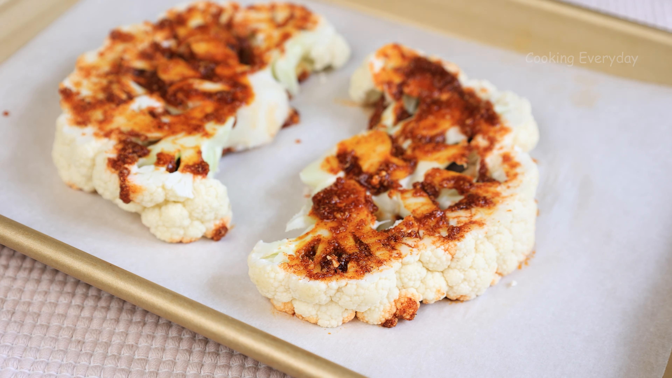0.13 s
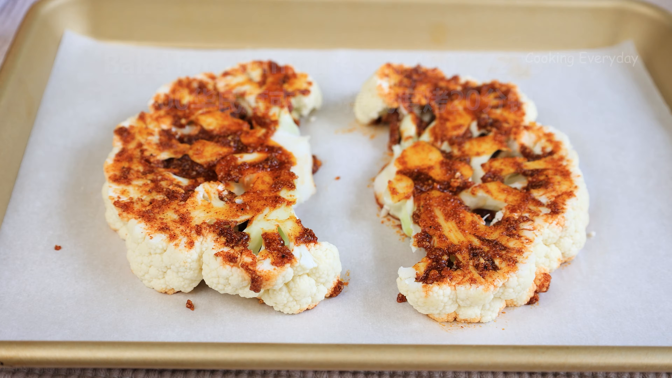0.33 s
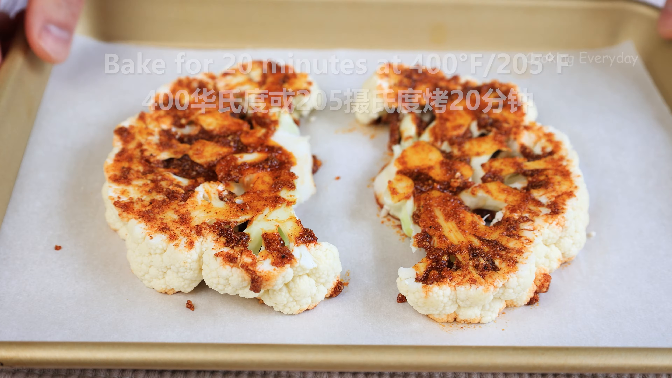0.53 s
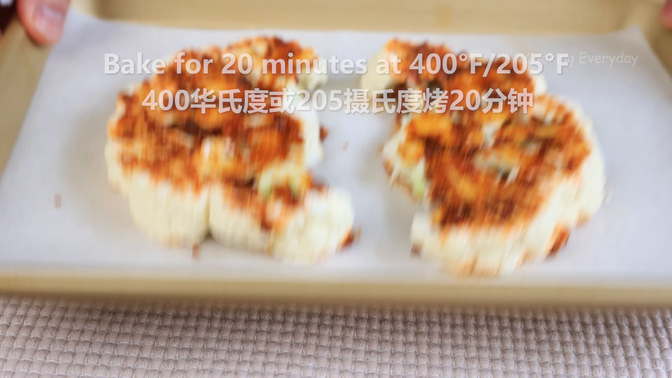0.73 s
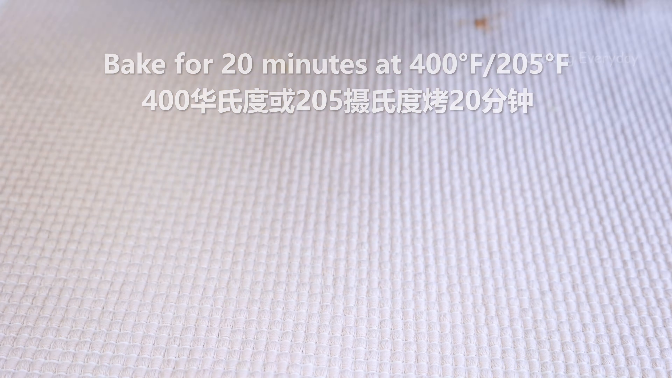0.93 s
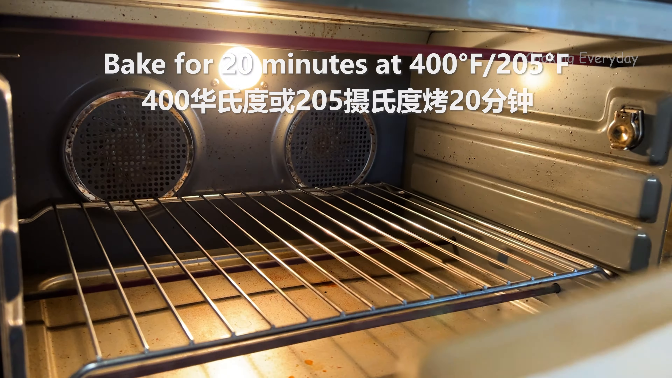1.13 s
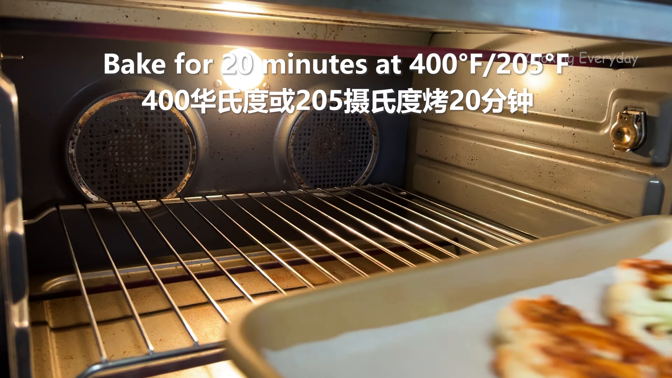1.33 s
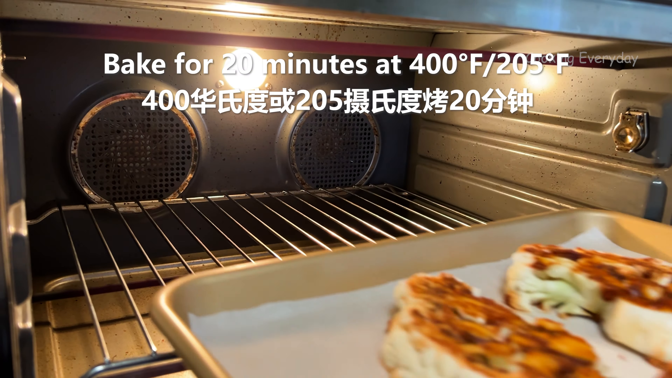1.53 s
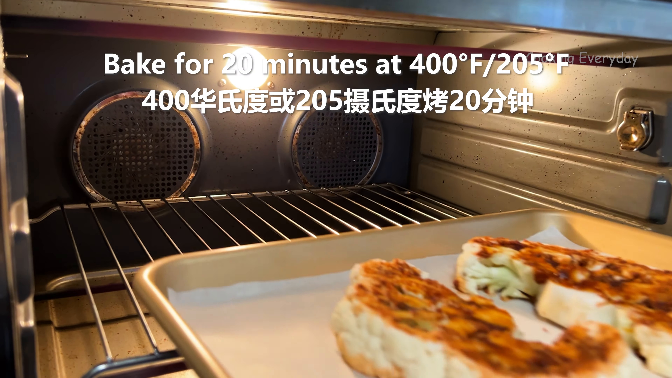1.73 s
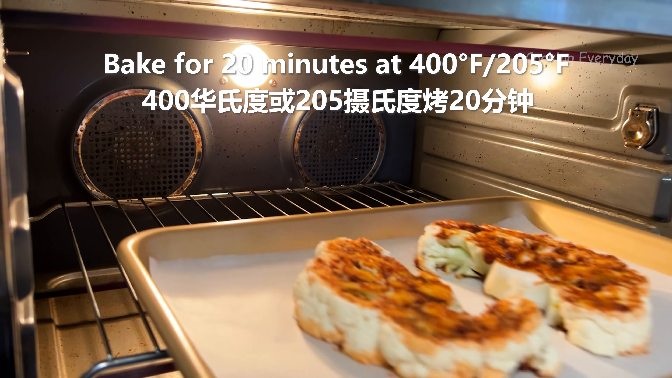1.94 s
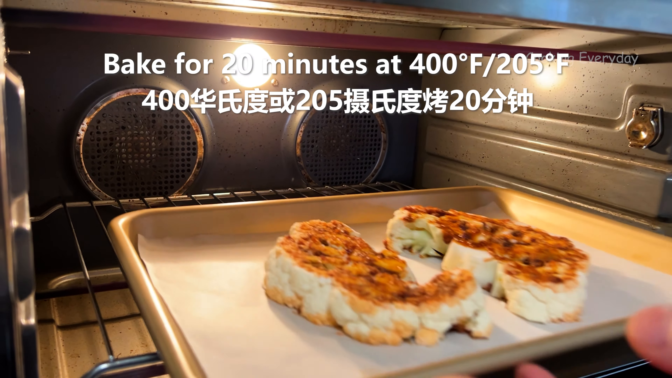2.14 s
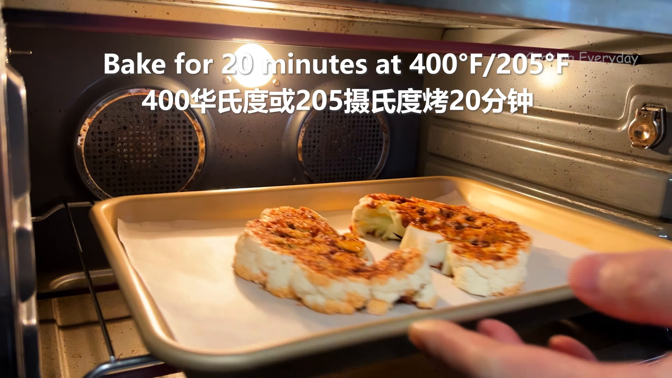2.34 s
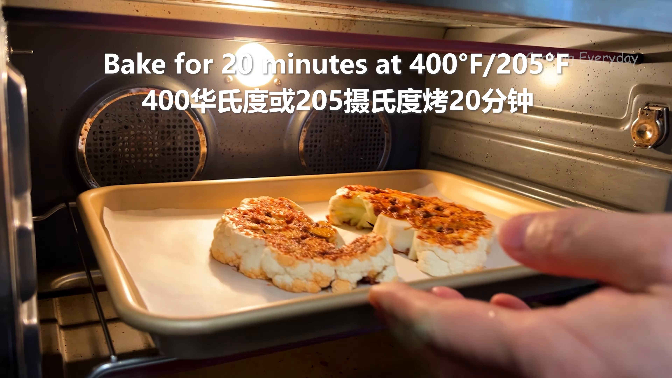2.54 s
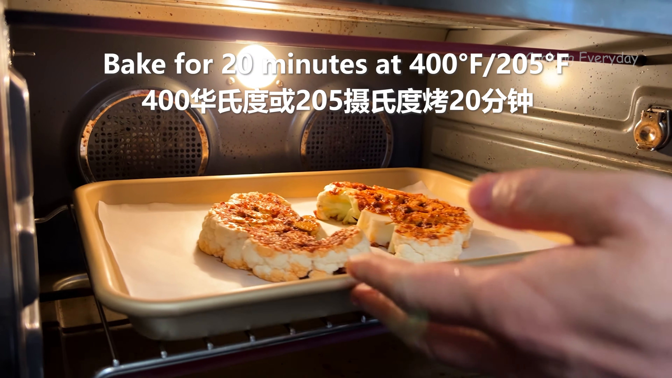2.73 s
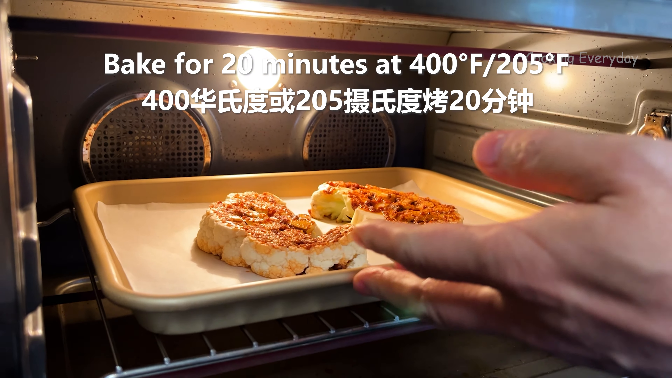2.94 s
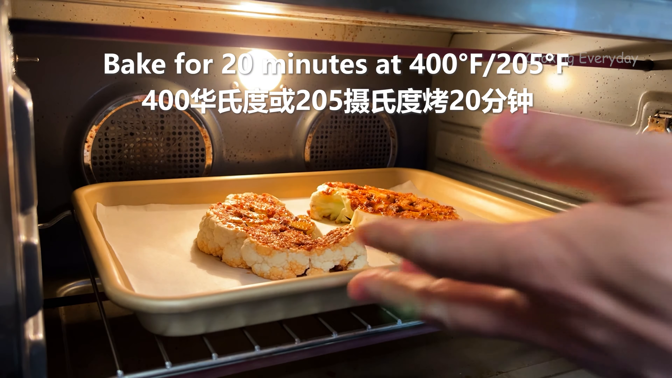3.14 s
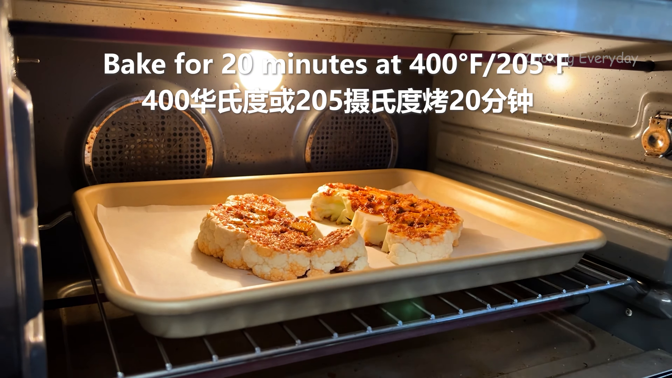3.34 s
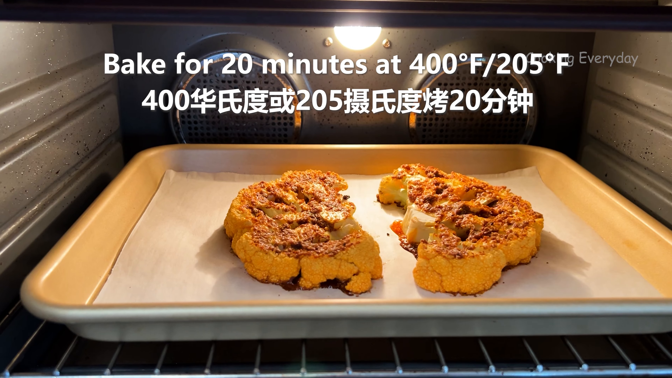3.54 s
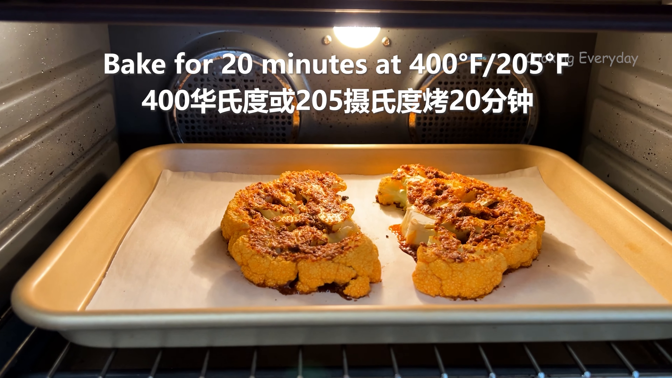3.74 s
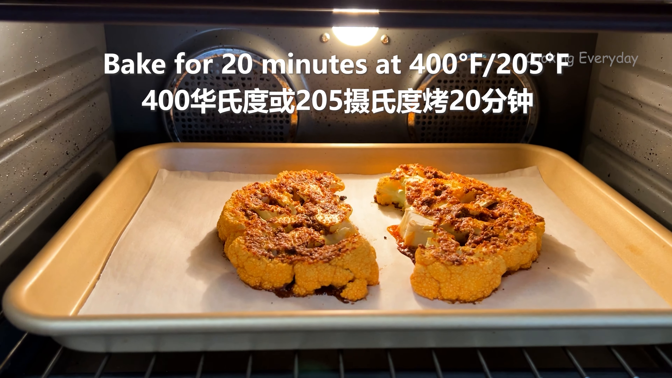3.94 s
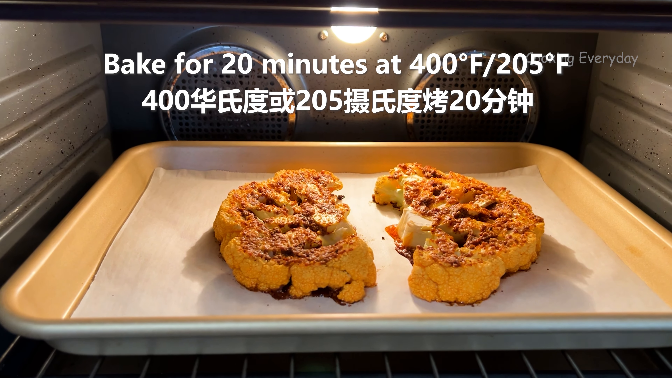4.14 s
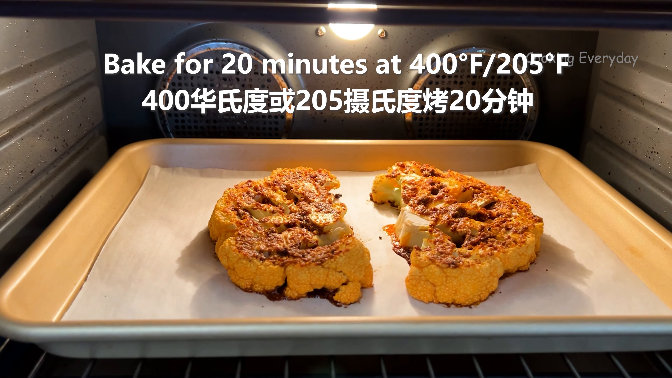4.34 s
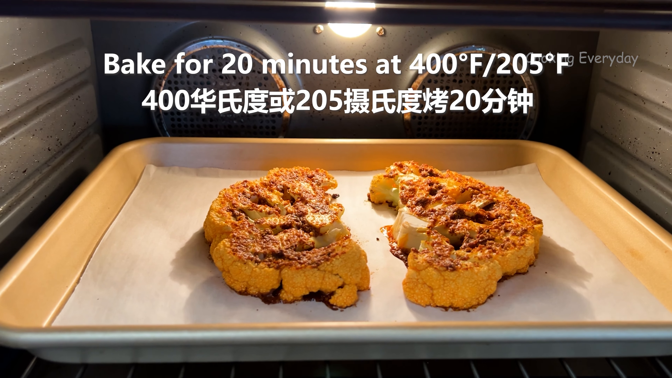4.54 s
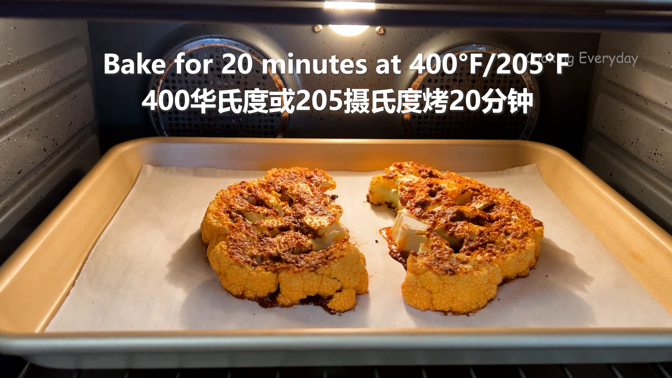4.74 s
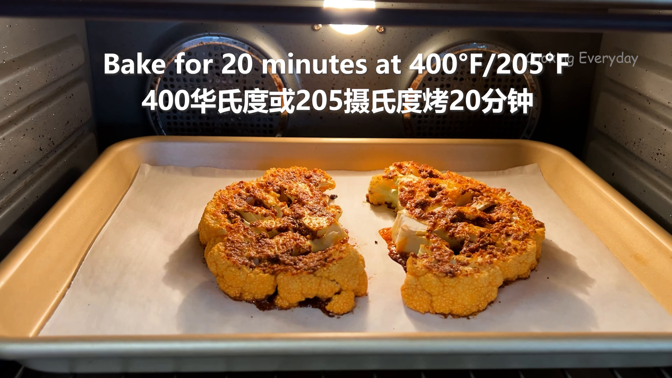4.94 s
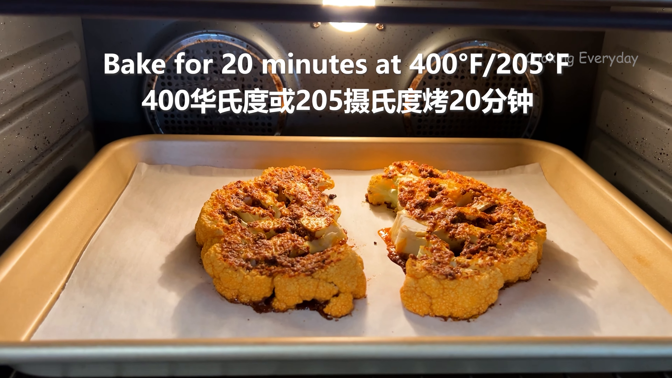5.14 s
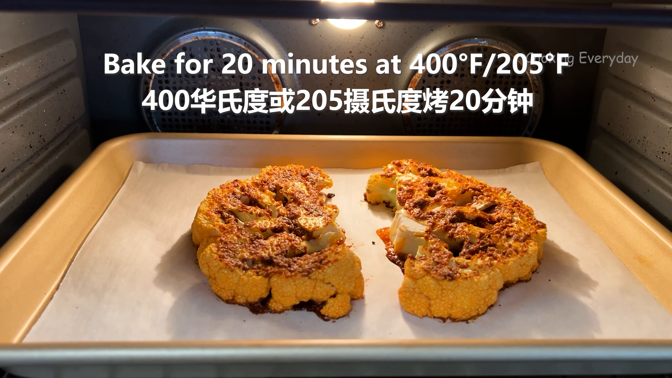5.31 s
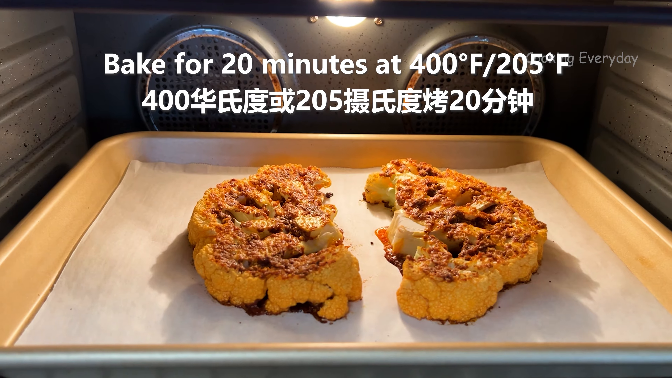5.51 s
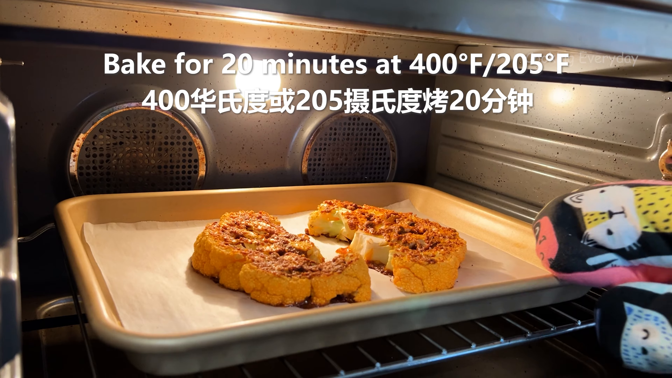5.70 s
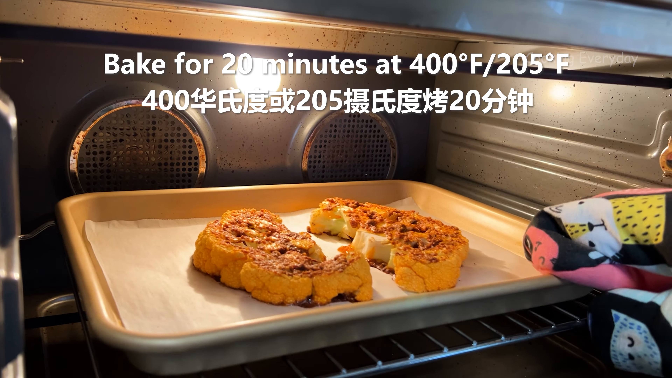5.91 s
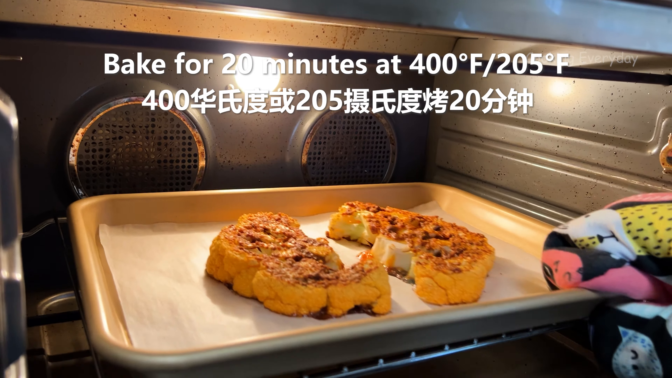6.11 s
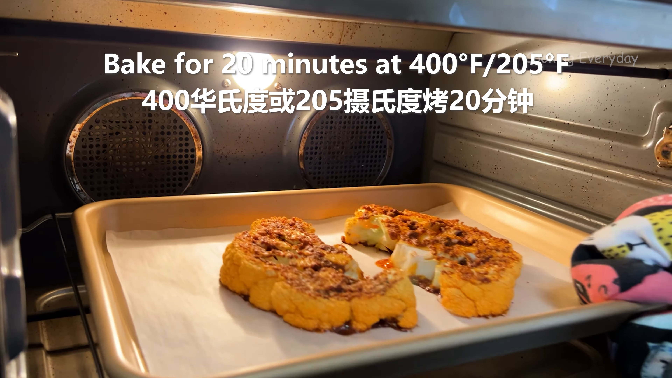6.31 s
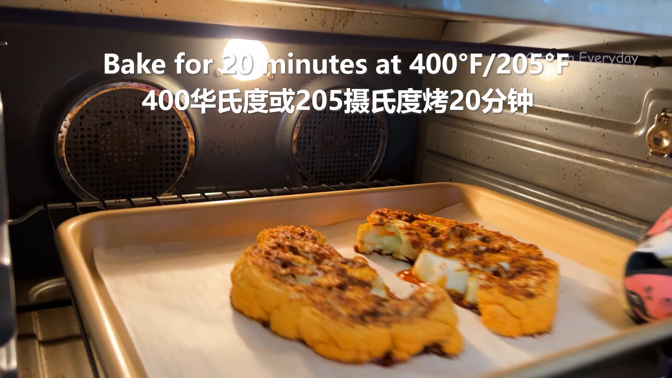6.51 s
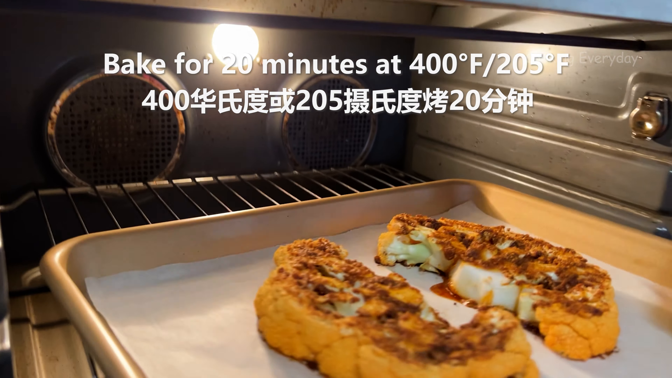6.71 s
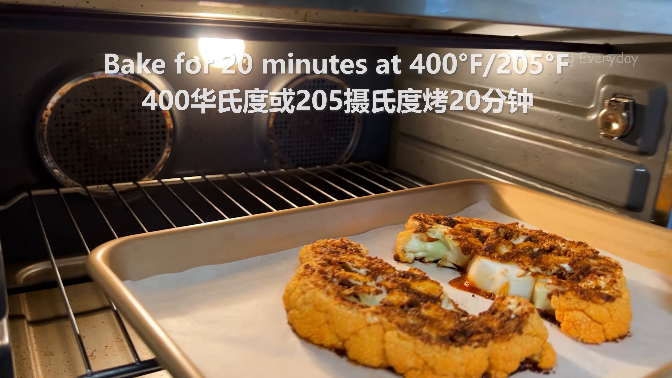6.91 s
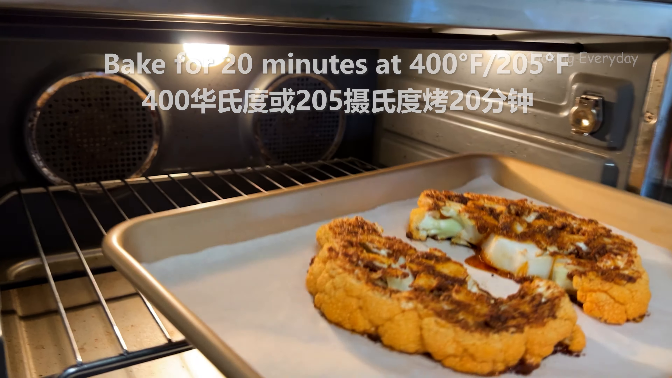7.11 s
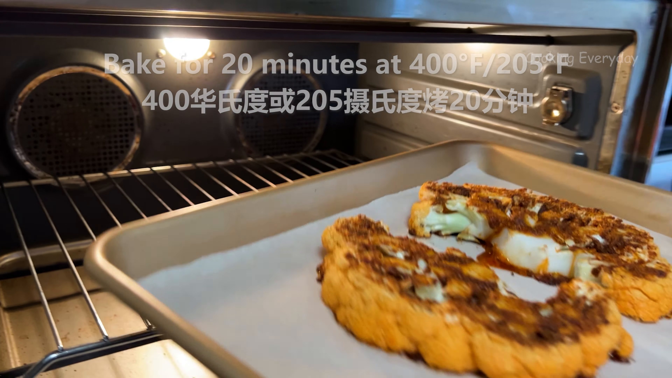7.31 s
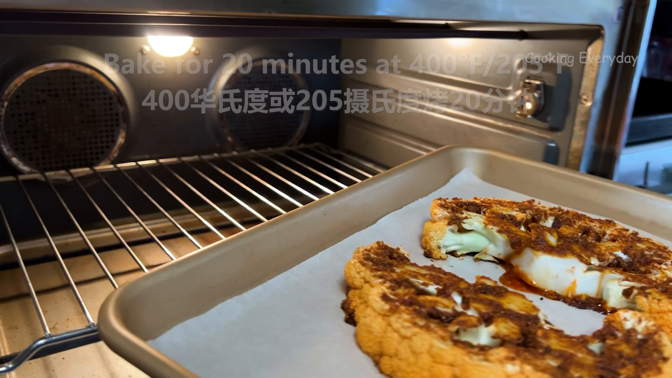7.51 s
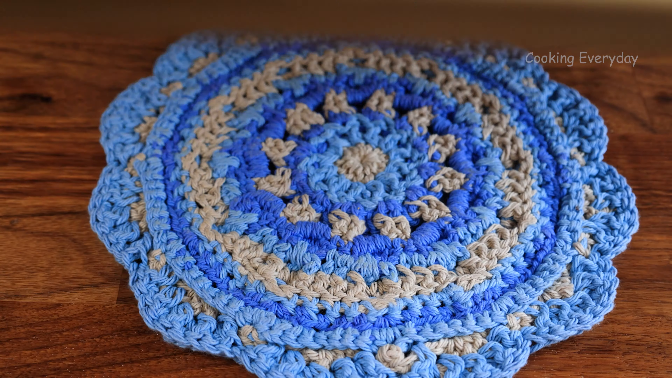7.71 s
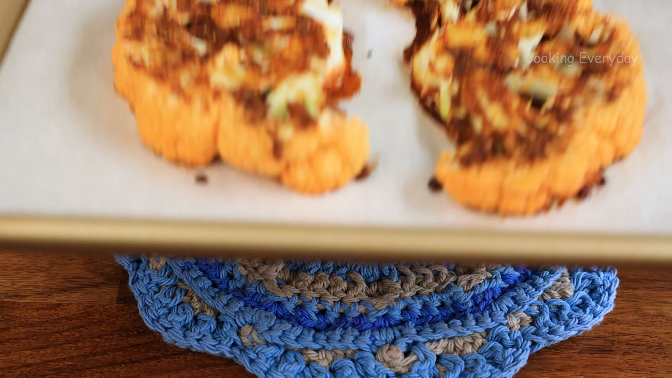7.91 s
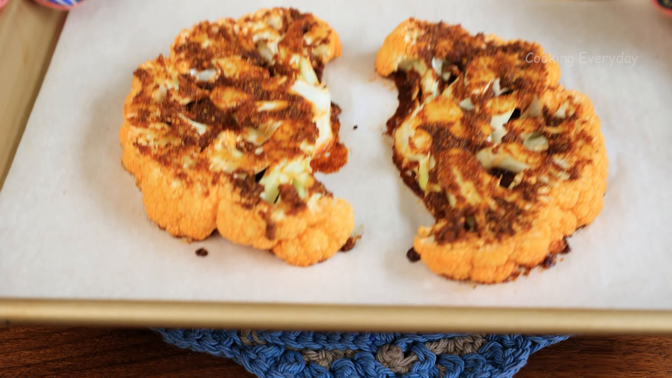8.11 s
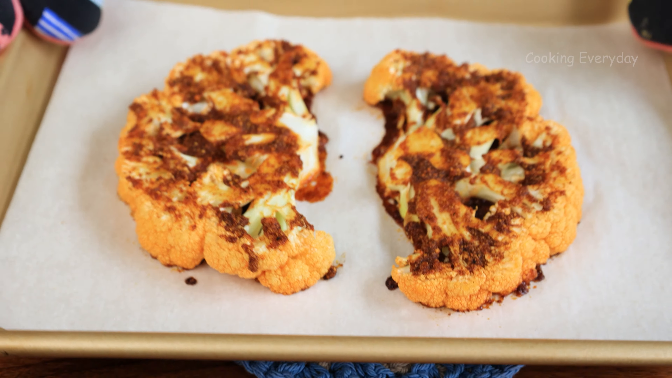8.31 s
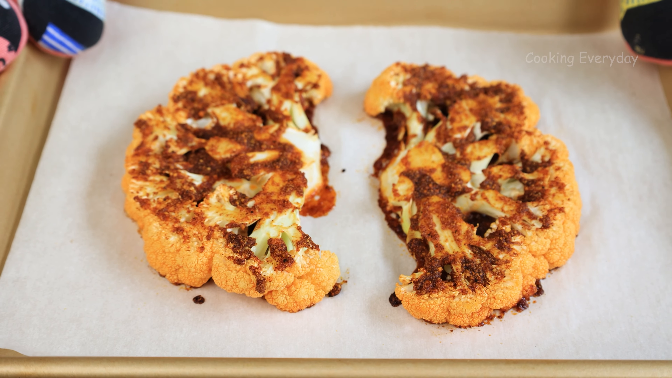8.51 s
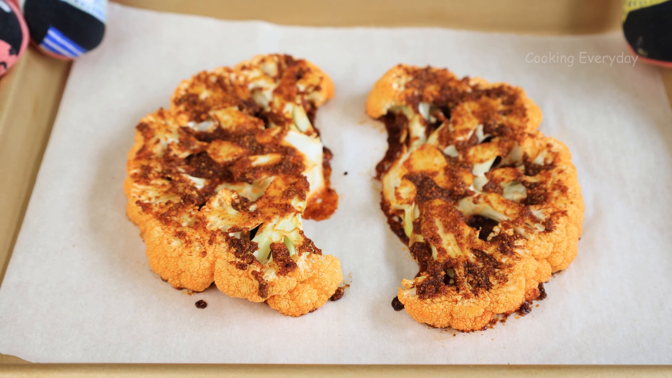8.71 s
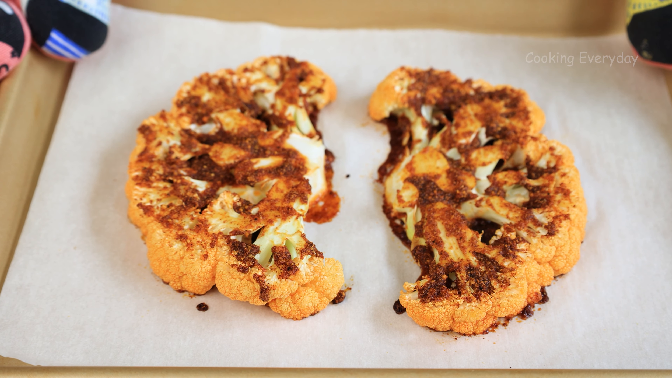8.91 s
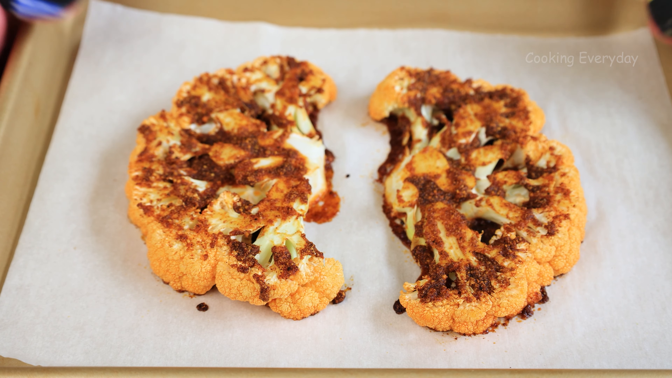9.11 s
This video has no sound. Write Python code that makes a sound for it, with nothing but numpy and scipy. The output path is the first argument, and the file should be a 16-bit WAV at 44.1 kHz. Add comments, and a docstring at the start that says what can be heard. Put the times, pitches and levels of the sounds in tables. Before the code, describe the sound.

Very quiet cloth rustles and a low soft bump occupy the first 1.2 seconds, then a faint, fading low oven drone. At 1.7 a thin metal tray bangs hard on a wire rack, hits again at 1.8, and scrapes inward with knocks, brief metallic singing and a firmer clatter near 2.4. At 3.03 it drops and rocks, ticking ever softer until 3.5. A cut brings close, fine sizzling. Dull footsteps run from 4.0 to 5.6; sharp hollow clacks come at 4.55 to 4.85 and 5.1. From 5.7 the tray shifts, groans low at 6.2, then bumps and scrapes strongest at 6.65 to 6.9. A low beating metal hum fades under tiny high steam squeaks and fat pops at 7.2 to 7.6. After a cut at 7.67, two small pops, then faint table-side fizzing and barely audible glove rubs until about 9.1.

```python
"""A baking tray is lifted off a cloth, banged onto an oven rack, slid in and left rocking on the wires.
Then the food sizzles, steps thud, something clacks nearby, the tray is dragged out and set on a table.
The scenes follow each other by hard cuts; oven and table are heard by differently placed microphone pairs."""
import sys
import numpy as np
from scipy import signal
from scipy.fft import rfft, irfft, next_fast_len
from scipy.io import wavfile
from scipy.ndimage import uniform_filter1d

SR = 44100
rng = np.random.default_rng(int(sys.argv[2]) if len(sys.argv) > 2 else 0)


def output_pcm(signal):
    """Save a mono or channel-first signal as 16-bit PCM at the path in sys.argv[1].

    Samples are clipped to [-1, 1] before scaling.
    """
    pcm = np.clip(np.atleast_2d(signal).T, -1, 1) * 32767
    wavfile.write(sys.argv[1], SR, np.round(pcm).astype(np.int16))


N = 403515

# the tray sliding on the rack: (s, weight on the rack dB, scrape on the wires dB)
SLIDE_IN, SLIDE_OUT = [
    [(1.695, -31.5, -27.5), (1.723, -22.5, -41), (1.921, -34.5, -54.5), (2.267, -51, -52), (2.441, -34.5, -41),
     (2.557, -46.5, -46.5), (2.965, -44, -64.5), (3.03, -72, -57)],
    [(5.66, -70, -66), (5.96, -60.5, -83.5), (5.995, -42, -73), (6.08, -50.5, -54.5), (6.13, -37, -72.5), (6.32, -42, -63), (6.4, -46.5, -69),
     (6.5, -49, -61.5), (6.72, -31.5, -55), (6.82, -33, -64.5), (6.89, -38.5, -51.5), (7.05, -48.5, -72), (7.29, -67, -88.5), (7.67, -60, -100)],
]
# tray meets rack: (s, thud dB, rim dB, wires dB)
BLOWS = [(1.6901, -22.5, -13, -21), (1.7967, -27, -26.5, -22.5), (1.959, -31, -72, -47), (2.05, -85, -40, -40), (2.121, -43.5, -44, -36),
         (2.207, -29.5, -69, -52), (2.402, -24.5, -66, -40.5), (2.438, -30, -44, -26.5), (2.573, -49, -35, -29.5), (3.022, -57, -30, -36), (3.03, -38, -45, -24.5),
         (5.681, -66.5, -53, -36), (6.072, -35, -46, -64), (6.093, -37.5, -75, -79), (6.221, -33.5, -85, -103), (6.6466, -31, -32, -29.5), (6.692, -30.5, -56, -28),
         (6.724, -68, -45, -28), (6.762, -28.5, -45, -34.5), (6.789, -44.5, -75, -51), (6.8746, -79, -62, -30.5)]
METAL = [(85, 30, -25), (158, 14, -6), (183, 14, 0), (212, 12, -2), (236, 12, -5), (370, 30, -10), (435, 10, -7), (466, 14, -12), (539, 22, -10), (693, 16, -9), (740, 18, -9.5), (892, 10, -9), (1020, 14, -11), (1219, 14, -8), (1437, 16, -14), (1948, 30, -14), (2280, 30, -14), (2512, 30, -15), (2715, 24, -19), (3193, 24, -14), (3700, 70, -22), (3930, 60, -21), (4250, 150, -25), (4700, 90, -21), (5700, 40, -26), (7300, 60, -26)]  # tray and rack modes: (Hz, width Hz, dB)  # fixed
SHEET = [(30, -55), (100, -20), (200, 7.5), (320, 4), (600, 1.5), (2700, -0.5), (5600, -10.5), (9600, -22), (11500, -17.5), (15900, -24)]  # between the modes: (Hz, dB per Hz)
PART_HZ = [55, 300, 1000, 3400, 6500, 16500]  # edges of belly, panel, rim, wires, wire treble  # fixed
BLOW_T60 = [0.027, 0.09, 0.14, 0.056, 0.033]  # how long each part rattles after a blow (s)
# clacks in the kitchen: (s, level dB, then boom, thunk, knock, snap dB relative to it, crack t60 s)
CLACKS = [(4.5574, -41.5, -32.5, -46.5, -28, -18, 0.13), (4.628, -29, -22.5, -22.5, -10.5, -15.5, 0.18),
          (4.7103, -34, -57, -36, -25, -55, 0.13), (4.8304, -28.5, -27.5, -16.5, -34, -20, 0.13),
          (5.1133, -32.5, -61.5, -54, -44, -35, 0.1)]
STEPS = [(4.023, -54, 0.066), (4.386, -50, 0.073), (4.656, -48, 0.07), (4.95, -38.5, 0.067), (5.22, -42, 0.063),
         (5.589, -54.5, 0.064)]  # footfalls: (s, level dB, length s)
BOARDS = [(25, -7), (49, -5.5), (113, 11.5), (143, 1), (194, -30), (340, -84)]  # floor boards: (Hz, dB per Hz)
DRONE = [(42, -13), (60, 17), (80, -16), (130, -43), (320, -100)]  # (Hz, dB per Hz)
FRY_OVEN, FRY_TABLE = [
    [(3.52, -59.5, -66.5), (4.46, -60, -78.5), (4.83, -56, -73.5), (5.44, -58, -79), (6.78, -48.5, -61),
     (7.06, -54.5, -69), (7.67, -57, -81.5)],
    [(7.67, -56.5, -69), (8.642, -61.5, -78), (9.15, -59.5, -80)],
]  # (s, sizzle dB, low murmur dB)
FIZZ_OVEN = [(1530, -100), (2600, -24), (3240, -3), (4490, -3.5), (9210, -0.5), (11700, -3.5), (13500, -4.5), (15900, -8.5)]  # (Hz, dB per Hz)
FIZZ_TABLE = [(1530, -51), (2600, -11), (3970, 0.5), (5800, -3), (6360, 3.5), (12200, -10), (15900, -17.5)]  # (Hz, dB per Hz)
SPITS = [(7.2697, -37), (7.493, -32.5), (7.7624, -39), (7.8688, -35)]  # loudest pops of fat: (s, level dB)
WEAVE, DRAG, ROOM = [(590, -19.5), (2410, 0.5), (3490, -1), (4830, 1), (5170, -7.5), (5880, -4),
                     (7940, -13.5), (15900, -12)], [(160, -56), (280, -16), (550, 10), (633, -5), (890, -0.5), (1300, -56),
                         (2860, -120)], [(30, -64), (177, -11), (302, -19.5), (400, -11), (520, -45), (880, -120)]  # (Hz, dB per Hz)
ALIKE_OVEN = [(60, 0.94), (250, 0.98), (500, 0.5), (1300, 0.31), (4500, 0.32), (5500, 0.017), (6800, 1), (10500, 1), (13300, 0.93), (15500, 0.62)]  # (Hz, likeness)
ALIKE_TABLE = [(60, 1), (1400, 0.72), (3000, 0.33), (7000, 0.12), (10000, -0.53), (15500, 0.94)]  # (Hz, likeness)
TURN_HZ = 6748  # over this the right port leads by one cycle for each such step
TABLE_FROM = 7.67  # s, fixed
TOP_HZ = 15950  # fixed
CLACK_TOP = [(1760, -52.5), (3000, -3.5), (9160, 8), (13100, 1), (15900, -10)]  # (Hz, dB per Hz)
CLACK_BODY = [[(229, 20, 0)], [(390, 48, 6.5), (532, 39, 5.5)], [(890, 170, 7), (1270, 250, 0.5)], [(2136, 130, 10.5), (2570, 190, 8.5), (3000, 1200, -2)]]  # boom, thunk, knock, snap modes: (Hz, width Hz, dB)
CAVITY = [(211, 26, -1.5), (782, 75, -10), (970, 20, 2), (1187, 28, 9), (1353, 53, 3.5), (2360, 430, -8)]  # air in the oven: (Hz, width Hz, dB)
KITCHEN = [(47, -63), (80, -41), (177, -4.5), (258, -20), (344, -1.5), (418, -15), (678, -9), (1800, -22.5), (2340, -31),
           (3960, -120)]  # (Hz, dB per Hz)
MITTS = [(7.822, -70, 0.54, 0.69), (8.468, -68, 0.047, 0.46), (8.89, -64.5, 0.16, 0.06)]  # oven gloves shift on the tray rim; same columns
FELT = [(450, -14.5), (650, -7.5), (1200, 0), (1800, -7.5), (2500, -8), (3400, -25)]  # (Hz, dB per Hz)
SETTLE = [(-36.5, 54), (-43, 66.5), (-85, 92), (-59, 77)]  # belly, panel, rim, wires: (start dB, loss dB per s)
ROCKING = [(3.0738, -32.5), (3.113, -35), (3.166, -37), (3.207, -39), (3.2233, -47.5), (3.2482, -44.5), (3.2966, -46), (3.339, -52),
           (3.3804, -52), (3.425, -60.5), (3.474, -69.5), (3.513, -63)]  # the tray ticks as it rocks: (s, wires dB)
TICK_DB = (-25.5, -11)  # thud and rim above the wires in a tick
SQUEAK = [(7.214, 0.069, 3660, 3050, -62.5), (7.355, 0.022, 4304, 4500, -58), (7.408, 0.047, 4750, 4150, -55), (7.445, 0.068, 4200, 3263, -61), (7.515, 0.058, 4004, 3857, -61.5), (7.63, .035, 4520, 3740, -62)]  # steam squeaks out of the food: (s, length s, from Hz, to Hz, dB)
STROKES = [(2.043, 2.24, -62, -55), (6.433, 6.606, -60.5, -51)]  # firm shoves that start and stop at once: (s from, s to, rim dB, wires dB)
RUSTLE = [(.03, -52.5, 0.045, 0.11), (.41, -82, 0.1, 0.096), (.68, -58, 0.13, .11), (.83, -77.5, 0.0083, 0.4), (.98, -64.5, 0.074, 0.05), (1.16, -64.5, 0.16, 0.11)]  # hands on the cloth: (s, peak dB, rise s, fall s)
WEIGHT_SHARE = [0.72, 0.47, 0.13, 0]  # how far belly, panel, rim, wires follow the weight rather than the scrape
PANEL_SHARE, PANEL_DB = 0.61, 3  # a blow's panel level: a weighted mix of thud and wires, plus a dB offset
SETTLE_S = (3.03, 3.53)  # let go, the tray shivers to rest until the scene cuts  # fixed
HUM_S = (1.195, 1.69)  # the low oven drone is heard while the oven stands empty  # fixed
HUM_DB, HUM_LOSS_DB_PER_S = -65.5, 24
LIFT = [(6.88, -40, 0.4, 0.39), (7.6, -62.5, 0.92, .5)]  # the freed tray hums on: (s, level dB, rise s, fall s)
OVEN_FROM = 1.19  # s, fixed
PULL = [(.12, -80.5, 0.083, 1), (.9, -72, 0.05, 0.9), (.98, -58.5, 0.088, 0.067), (1.1, -61, 0.22, 0.024)]  # the tray drags over the cloth; same columns
BUMPS = [(.666, -73.5, 0.058, 0.29)]  # soft low bumps; same columns
ROOM_DB, ROOM_LOSS_DB_PER_S, ROOM_UNTIL = -81.5, 0, 0.61  # a low room tone holds a steady level, then stops (s)
ALIKE_TRAY = [(60, 0.97), (240, 0.98), (500, 0.67), (950, 0.52), (1900, 0.099), (3800, 0.52), (5500, 0.028), (6800, 1), (10500, 1), (13300, .93), (15500, .7)]  # (Hz, likeness)
BLOW_RISE = [0.015, 0.01, 0.0032, 0.0044, 0.0018]  # the heavy parts speak later (s)
PUSH_DB, PUSH_LATE_S = (23, 4.5), 0.0074  # the single push that a blow gives belly and panel: over the thud, after the click
TICK_HZ, TICK_T60, TICK_RING_DB = 4275, .03, -2.5  # the one wire that every tick plucks
SINGING = [(1.87, 0.13, 1900, 1875, -48), (2.155, 0.067, 2860, 2970, -46), (6.235, .135, 212.8, 205.8, -36.5), (6.81, 0.1, 2495, 2345, -46), (6.835, 0.058, 1429, 1450, -54),
           (6.882, 0.056, 1194, 1220, -49.5)]  # the sliding rim makes one mode sing: (s, length s, from Hz, to Hz, dB)
LIFT_HZ, BEAT_HZ, BEAT_DEPTH, BEAT_TOP_S = 155, 7.2, .65, 7.49  # two close modes beat  # fixed
PINGS = [(1.701, 1222, -24), (1.712, 3280, -32), (1.799, 4300, -32), (1.799, 4900, -29.5), (2.051, 3620, -36), (2.122, 2386, -35.5), (2.22, 3350, -41), (2.441, 2540, -32), (2.441, 3193, -27),
         (3.03, 4150, -33), (6.723, 2480, -40)]  # contacts that favour one mode: (s, Hz, dB)
PING_CYCLES = 300  # cycles until 60 dB are lost  # fixed
LEAN = [(150, -1.56), (500, 2), (3000, 0)]  # tray, left over right: (Hz, dB)


def amp(db):
    """dB to gain."""
    return 10 ** (np.asarray(db) / 20)


def unit(x):
    """Scale to rms 1."""
    return x / np.sqrt(np.mean(x ** 2) + 1e-20)


def along(points, hz):
    """(Hz, value) points on a log axis."""
    f, v = np.transpose(points)
    return np.interp(np.log(hz + 1), np.log(f + 1), v)


def gains(rows):
    """A gain per sample for each dB column, silent outside the table."""
    s, *cols = np.transpose(rows)
    return [amp(np.interp(np.arange(N) / SR, s, c, -200, -200)) for c in cols]  # fixed


def filtered(x, response):
    """x times a complex response of frequency."""
    m = next_fast_len(N + 8192)
    return irfft(rfft(x, m) * response(np.fft.rfftfreq(m, 1 / SR)), m)[..., :N]


def modes(table, f):
    """Causal response of (Hz, width, dB) resonances."""
    return sum((-1) ** k * amp(db) * 1j * f * w / (c * c - f * f + 1j * f * w) for k, (c, w, db) in enumerate(table))


def noise(spectrum):
    """Noise pair of one colour."""
    return drawn(lambda hz: amp(along(spectrum, hz)))


def bursts(times, levels_db, t60s, rise):
    """Envelope of sudden starts that die away."""
    out, t = np.zeros(N + SR), np.arange(SR // 3) / SR
    for s, db, t60 in zip(times, levels_db, t60s):
        out[round(s * SR):][:len(t)] += amp(db - 60 * t / t60) * (1 - np.exp(-t / rise))
    return out[:N]


def grit(per_s, spread_db, life):
    """Gain of a rough contact: tiny random catches over an even rub."""
    catches = np.zeros(N)
    at, size = rng.random((round(per_s * N / SR), 2)).T
    catches[(at * N).astype(int)] = amp(-spread_db * np.log(size + 0.013))
    return unit(1 + signal.lfilter([1], [1, -np.exp(-1 / (life * SR))], catches))


def ports(pair, alike, turn_hz):
    """Two microphone ports: partly alike, the treble of one ahead of the other."""
    mix = lambda hz: np.arccos(np.clip(along(alike, hz), -1, 1)) / 2
    lead = lambda hz: np.pi * np.maximum(hz / turn_hz - 1, 0)
    mid, side = filtered(pair, lambda hz: np.array([np.cos(mix(hz)), np.sin(mix(hz))]))
    return filtered(np.array([mid + side, mid - side]), lambda hz: np.exp(1j * np.outer([-1, 1], lead(hz))))


def tray():
    """Rubbing and blows drive the same modes; each part of the metal has its own level."""
    ticks = [(s, db + TICK_DB[0], db + TICK_DB[1], db) for s, db in ROCKING]
    s, thud_db, rim_db, wires_db = np.transpose(BLOWS + ticks)
    panel_db = PANEL_DB + PANEL_SHARE * thud_db + (1 - PANEL_SHARE) * wires_db
    treble_db = wires_db - 5 + .7 * (wires_db + 30)  # softer blows are duller  # fixed
    blow_db = [thud_db, panel_db, rim_db, wires_db, treble_db]
    settle = [(at, *(db - loss * (at - SETTLE_S[0]) for db, loss in SETTLE)) for at in SETTLE_S]
    slide = rubbed(SLIDE_IN) + gains(settle) + rubbed(SLIDE_OUT) + shoves()
    rub = np.vstack([slide, amp(-5.0) * slide[-1]])  # the treble follows the wires
    rub[2:] *= grit(per_s=400, spread_db=1.8, life=.0005)  # only the light parts follow small catches  # fixed
    hits = [bursts(s, db - 4.5, np.full(len(s), t60), rise) for db, t60, rise in zip(blow_db, BLOW_T60, BLOW_RISE)]
    contact = patches(4, wide=2, long=7)  # the contact point wanders, so it drives now one mode, now another  # fixed
    even = rng.standard_normal((2, N))  # belly and treble are rubbed, wires struck, evenly
    drive = rub[:, None] * [even, contact, contact, contact, even] + np.array(hits)[:, None] * [contact, contact, contact, even, even]
    drive[:2, 0, np.round((s + PUSH_LATE_S) * SR).astype(int)] += amp(thud_db + np.array(PUSH_DB)[:, None])
    return filtered(drive, metal).sum(axis=0)


def clacks():
    """A bright crack, then a hollow body that speaks a little later and longer."""
    s, db, *body_db, t60 = np.transpose(CLACKS)
    out = bursts(s, db - 11.5, t60, rise=0.00019) * noise(CLACK_TOP)
    for table, above, stretch, rise in zip(CLACK_BODY, body_db, [3.5, 2.04, 1.2, 1.68], [0.023, 0.013, 0.03, 0.0035]):
        out += bursts(s, db + above - 4.0, stretch * t60, rise) * rung(table)
    return out


def steps():
    """Each footfall swells fast and dies in the floor boards."""
    swell, u = np.zeros(N), np.arange(SR // 2) / SR
    for s, db, length in STEPS:
        swell[round(s * SR):][:len(u)] += amp(db) * (u / length) ** 0.74 * np.exp(-(u / length) ** 1.51)
    return swell * noise(BOARDS)


def sizzle(level, fizz, spits):
    """Fat fizzes as fine noise with small bursting bubbles and a few sharp pops."""
    s, db = np.transpose(spits)
    pops = bursts(s, db - 9.5, np.full(len(s), .006), rise=0.00037)
    return (level * grit(per_s=150, spread_db=2.5, life=.0008) + pops) * noise(fizz)  # fixed


def cloth():
    """Hands and tray brush the table cloth in a quiet room; later gloves brush the tray."""
    room = gains(fading(0, ROOM_UNTIL, ROOM_DB, ROOM_LOSS_DB_PER_S))[0] + swells(BUMPS, 0, OVEN_FROM)
    drag = swells(PULL, 0, OVEN_FROM) * blotchy(DRAG, depth_db=6.0)
    lift = swells(RUSTLE, 0, OVEN_FROM) * blotchy(WEAVE, depth_db=3) + drag + room * blotchy(ROOM, depth_db=4.5)  # fixed
    return lift + swells(MITTS, TABLE_FROM, N / SR) * noise(FELT)


def patches(depth_db, wide, long):
    """Two unrelated white noises with patches of random gain, wide bins by long frames."""
    z = signal.stft(rng.standard_normal((2, N)), nperseg=512)[2]
    field = uniform_filter1d(uniform_filter1d(rng.standard_normal(z.shape[1:]), size=wide, axis=0), size=long, axis=1)
    return unit(signal.istft(z * amp(depth_db * unit(field)), nperseg=512)[1][:, :N])


def rung(table):
    """Noise pair through resonances."""
    return drawn(lambda f: modes(table, f))


def metal(f):
    """Response of each part of tray and rack, at equal power."""
    whole = modes(METAL, f) + amp(along(SHEET, f) - 21.0)
    lo, hi = np.array(PART_HZ[:-1])[:, None], np.array(PART_HZ[1:])[:, None]
    parts = whole / (1 + (lo / (f + 1)) ** 8) / (1 + (f / hi) ** 8)  # fixed
    parts = causal(abs(parts))
    return (parts / np.sqrt(np.mean(abs(parts) ** 2, axis=1, keepdims=True)))[:, None]


def lifted():
    """Off the rack, a low mode of the tray rings on, its level beating slowly."""
    t = np.arange(N) / SR - BEAT_TOP_S
    level = swells(LIFT, OVEN_FROM, TABLE_FROM) * (1 + BEAT_DEPTH * np.cos(2 * np.pi * BEAT_HZ * t))
    line = level * np.sin(2 * np.pi * LIFT_HZ * t)
    return np.array([line, 0 * line])


def drawn(response):
    """Two unrelated noises of rms 1 with the given response."""
    m = next_fast_len(N, real=True)
    hz = np.fft.rfftfreq(m, 1 / SR)
    re, im = rng.standard_normal((2, 2, len(hz)))
    return unit(irfft((re + 1j * im) * response(hz), m)[:, :N])




def shoves():
    """Extra rubbing of rim and wires during each firm shove."""
    out = np.zeros((4, N))
    for start, stop, *levels_db in STROKES:
        out[2:, round(start * SR):round(stop * SR)] = amp(levels_db)[:, None]
    return uniform_filter1d(out, size=500, axis=1)


def squeaks(rows, flutter):
    """Short whistles that glide and flutter in pitch and strength."""
    out = np.zeros((2, N))
    for s, length, from_hz, to_hz, db in rows:
        u = np.arange(round(length * SR)) / (length * SR)
        hz = to_hz + (from_hz - to_hz) * (1 - u) ** 2 + flutter * to_hz * np.interp(u * length * to_hz / 6, np.arange(80), rng.standard_normal(80))  # fixed
        out[0, round(s * SR):][:len(u)] += amp(db) * (1 + (hz - hz.mean()) / (hz.std() + 1) / 2) * np.sin(np.pi * u) ** .5 * np.sin(2 * np.pi * np.cumsum(hz) / SR)
    return out


def fading(start, stop, db, loss_db_per_s):
    """Two-point level line that sinks steadily."""
    return [(start, db), (stop, db - loss_db_per_s * (stop - start))]


def swells(rows, start, stop):
    """Gain of strokes that gain 20 dB in their rise time and lose it in their fall time, inside one scene."""
    t = np.arange(N) / SR
    each = [amp(db - 20 * np.where(t < s, (s - t) / rise, (t - s) / fall)) for s, db, rise, fall in rows]
    return sum(each) * (t >= start) * (t < stop)


def rubbed(rows):
    """Weight and scrape shared out over belly, panel, rim and wires."""
    weight, scrape = gains(rows)
    share = np.clip(WEIGHT_SHARE, 0, 1)[:, None]
    return weight ** share * scrape ** (1 - share)


def blotchy(spectrum, depth_db):
    """Noise pair of one colour that comes and goes in patches."""
    return unit(filtered(patches(depth_db, wide=2, long=16), lambda hz: amp(along(spectrum, hz))))


def plucked():
    """Each tick of the rocking tray rings one wire briefly; some contacts ring one mode out clearly."""
    ticks = [(s, TICK_HZ * (1 + 0.028 * rng.standard_normal()), db + TICK_RING_DB, TICK_T60) for s, db in ROCKING]
    pings = [(s, hz, db, PING_CYCLES / hz) for s, hz, db in PINGS]
    t = np.arange(N) / SR
    line = sum(bursts([s], [db], [t60], rise=.002) * np.sin(2 * np.pi * hz * (t - s)) for s, hz, db, t60 in ticks + pings)
    return np.array([line, 0 * line])


def causal(gain):
    """Minimum-phase response with the given gains."""
    c = irfft(np.log(gain + 1e-6))  # fixed
    half = c.shape[-1] // 2
    c[..., 1:half] *= 2
    c[..., half + 1:] = 0
    return np.exp(rfft(c))


def scene():
    """Oven and table, each through its own microphone placing."""
    oven_spits = [row for row in SPITS if row[0] < TABLE_FROM]
    table_spits = [row for row in SPITS if row[0] >= TABLE_FROM]
    (oven_fry, oven_air), (table_fry, table_air) = gains(FRY_OVEN), gains(FRY_TABLE)
    air = gains(fading(*HUM_S, HUM_DB, HUM_LOSS_DB_PER_S))[0] * noise(DRONE) + oven_air * rung(CAVITY)
    oven = squeaks(SQUEAK, flutter=.04) + clacks() + steps() + air + sizzle(oven_fry, FIZZ_OVEN, oven_spits)
    table = cloth() + table_air * blotchy(KITCHEN, depth_db=4.5) + sizzle(table_fry, FIZZ_TABLE, table_spits)  # fixed
    sheet = ports(tray() + lifted() + plucked() + squeaks(SINGING, flutter=.035), ALIKE_TRAY, TURN_HZ)
    sheet = filtered(sheet, lambda hz: amp(np.outer([.5, -.5], along(LEAN, hz))))
    return sheet + ports(oven, ALIKE_OVEN, TURN_HZ) + ports(table, ALIKE_TABLE, SR)  # fixed


def record(dry):
    """The camera keeps nothing above its band limit."""
    return filtered(dry, lambda hz: hz < TOP_HZ)


dry = scene()
out = record(dry)
output_pcm(out)
```